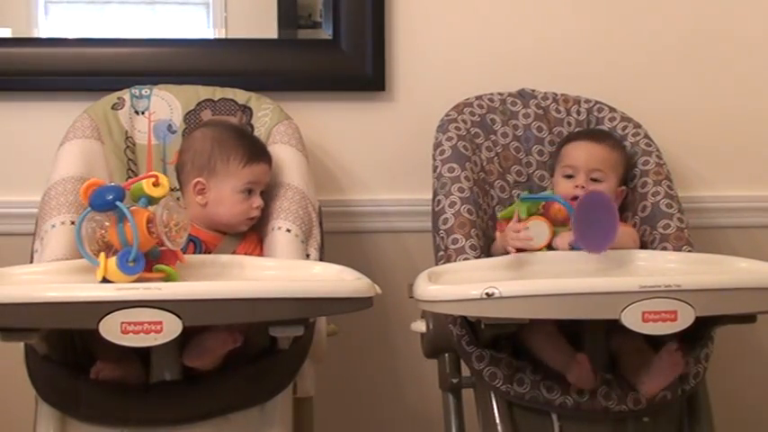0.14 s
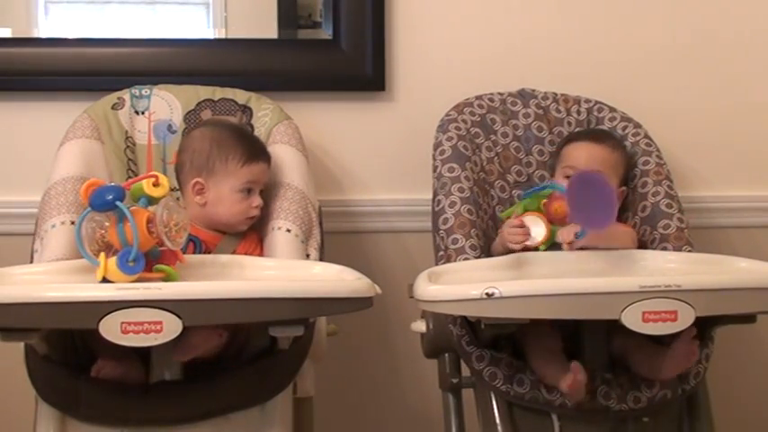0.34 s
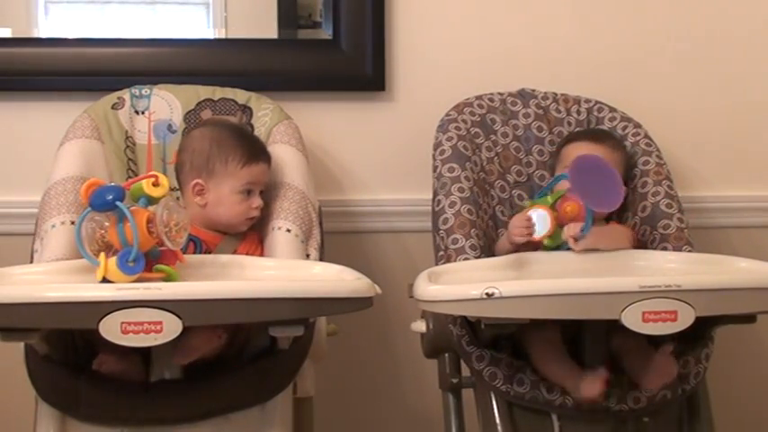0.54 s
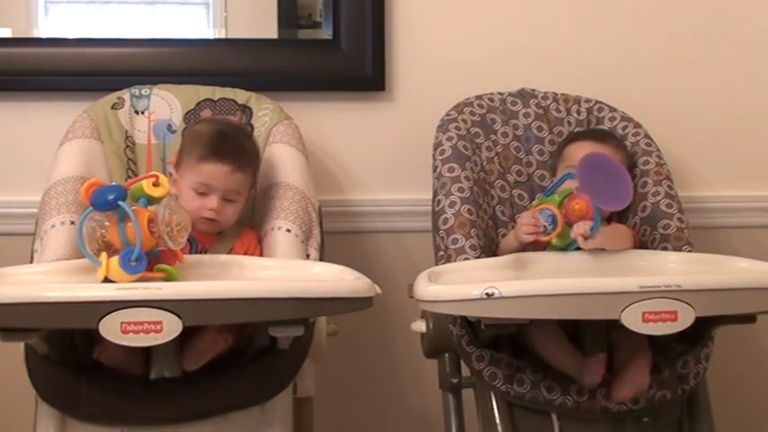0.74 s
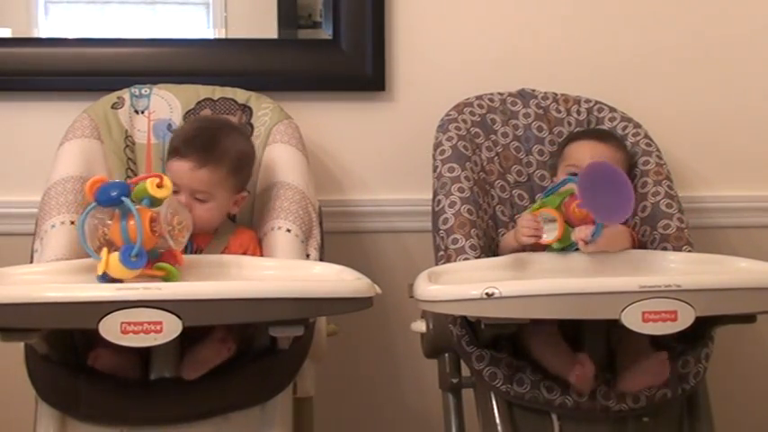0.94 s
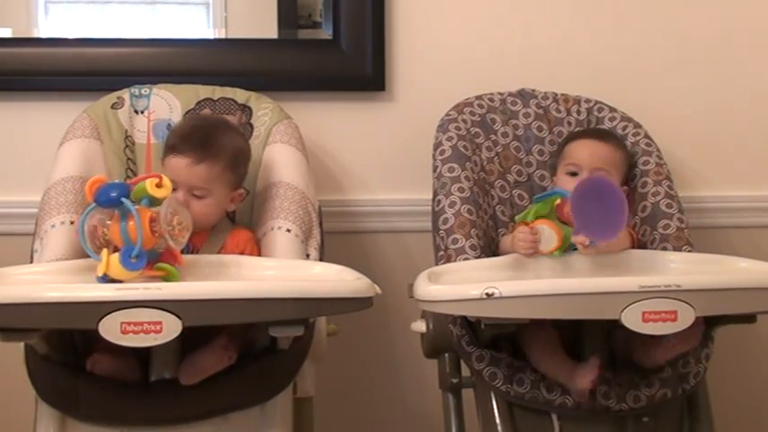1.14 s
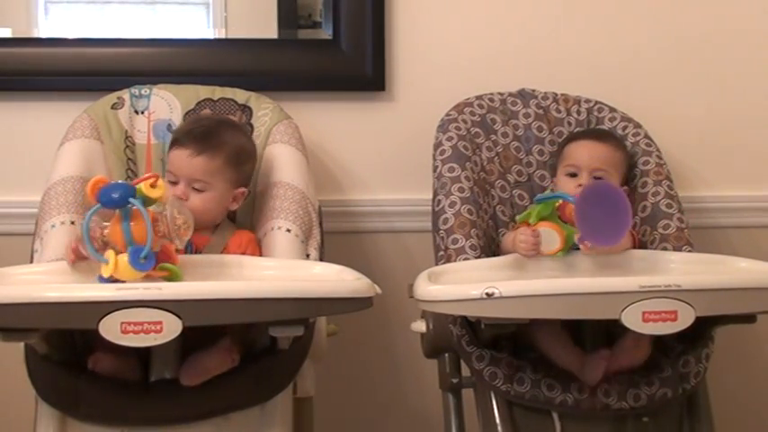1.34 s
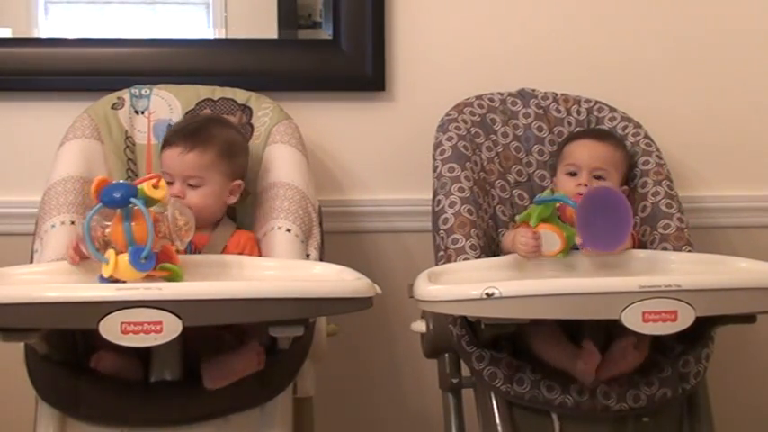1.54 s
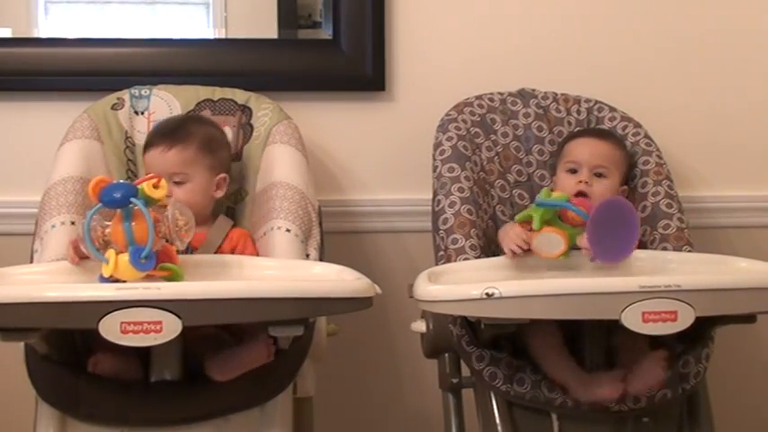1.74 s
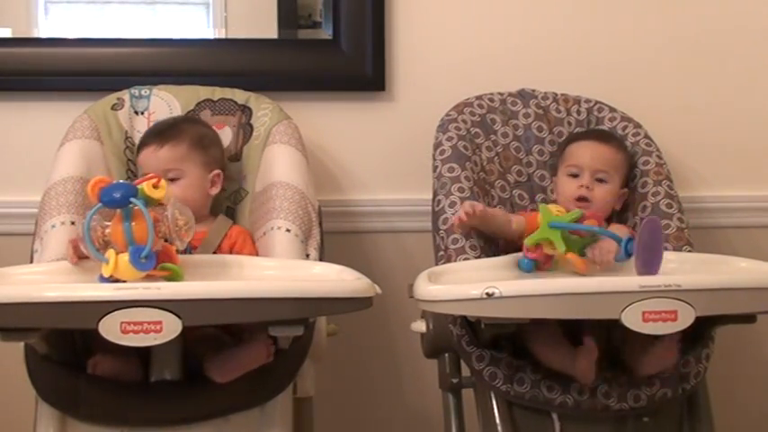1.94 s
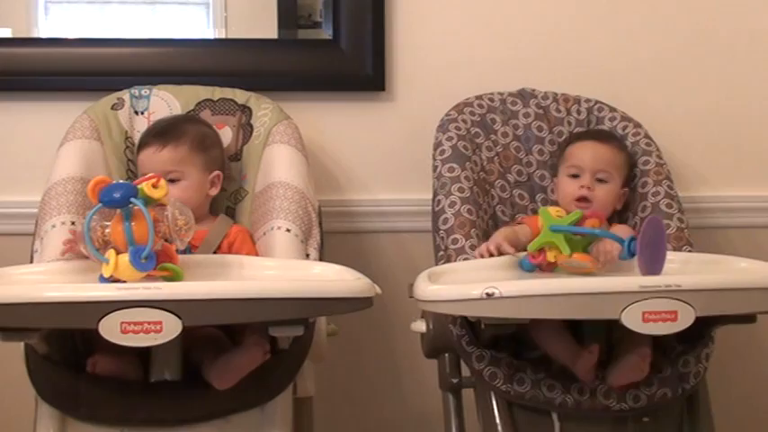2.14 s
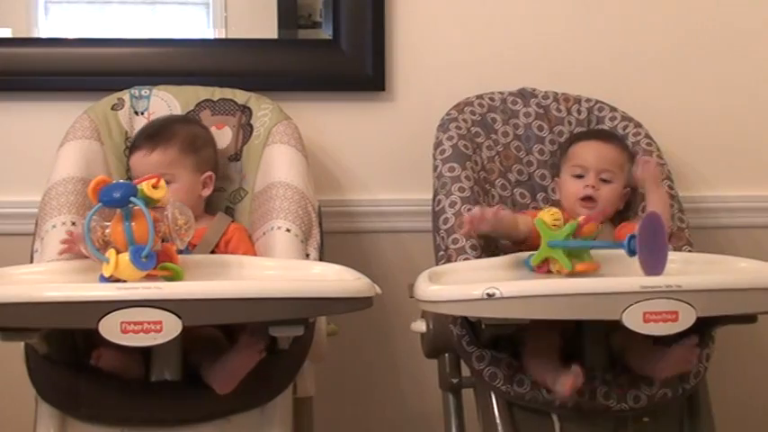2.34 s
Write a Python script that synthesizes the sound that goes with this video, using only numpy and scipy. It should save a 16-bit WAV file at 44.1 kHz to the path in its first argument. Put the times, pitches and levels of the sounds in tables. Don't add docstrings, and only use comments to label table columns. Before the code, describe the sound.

Baby shaking a plastic rattle: bell jingles, bead patter, sharp clacks and tray knocks with soft palm thumps, a quieter middle, then a loud late clatter, over low household hum, heard from a couple of metres.

```python
import sys
import numpy as np
from scipy import signal
from scipy.fft import rfft, irfft
from scipy.io import wavfile
from scipy.ndimage import uniform_filter1d, map_coordinates

SR = 44100
rng = np.random.default_rng(int(sys.argv[2]) if len(sys.argv) > 2 else 0)


def undo_db(level):
    steps = np.asarray(level, float) / 20
    return 10 ** steps


def int16_out(signal):
    q = np.round(np.clip(np.atleast_2d(signal).T, -1, 1) * 32767)
    wavfile.write(sys.argv[1], SR, q.astype(np.int16))


N = 105795
T = np.arange(N) / SR


def table(hz, rows):
    rows = np.array(rows)
    return np.interp(np.log(np.maximum(hz, 1)), np.log(rows[:, 0]), rows[:, 1])


def colour(x, rows):
    hz = np.arange(N // 2 + 1) * SR / N
    return irfft(rfft(x) * undo_db(table(hz, rows)), N)


def unit(x):
    return x / np.sqrt(np.mean(x ** 2))


def wander(s):
    size = int(s * SR)
    once = uniform_filter1d(rng.standard_normal(N), size=size)
    return unit(uniform_filter1d(once, size=size))


def ring(x, hz, t60, sway=0):
    decay = np.log(1000) / (max(t60, 1e-3) * SR)
    pole = np.exp(2j * np.pi * min(hz, SR / 2.3) / SR - decay)
    return (signal.lfilter([1], [1, -pole], x) * np.exp(1j * sway)).imag


def burst(hz, t60, gains):
    contact_s = 0.0012
    t = T[:6000, None]
    modes = gains * np.sin(2 * np.pi * hz * t) * np.exp(-np.log(1000) * t / t60)
    y = np.sum(modes, axis=1) * (1 - np.exp(-t[:, 0] / contact_s))
    return y / np.max(abs(y))


def add(out, s, x):
    i = int(s * SR)
    out[i:i + len(x)] += x[:len(out) - i]


# start_s, level_db, upper_db, lower_db (mode families relative to the main one)
PELLET_STRIKES = [(0.0595, -50, -10, -8), (0.0782, -41.5, -14, 5.5), (0.1236, -53, -8, -8),
                  (.134, -47, 11, -8), (.156, -36, -8, -10), (0.216, -35, -17, -32), (.236, -41, -10, -20),
                  (0.287, -37.5, -21, -11), (0.322, -48.5, 1, -10), (0.3358, -47, -7, -7),
                  (0.4016, -47, 2, 1), (0.416, -48, 7.5, -12), (0.435, -47, 2, 4), (0.4574, -49, -6, -11),
                  (0.477, -44, 4, -18), (0.5595, -46.5, 9.5, -14), (0.571, -43, 5, -17),
                  (0.5931, -39.5, -13, -24), (0.6138, -51, 11, 0), (0.6552, -34.5, -25, -13.5),
                  (0.6892, -39.5, -6, -10), (0.7135, -53, -11, -14), (0.7362, -49, -6, -14),
                  (0.749, -49, -6, 3.5), (0.7744, -54.5, 13.5, 1), (0.8, -51, 8, -13), (.845, -46, 2, -6),
                  (0.869, -52, 1, -16), (1.2288, -46.5, -15, -16), (1.251, -43.5, -4, -18),
                  (1.28, -37.5, -16, -8), (1.296, -39, 0, -8), (1.314, -36, -8, -19),
                  (1.3445, -43.5, 8.5, -6), (1.378, -43, -2, -2.5), (1.4077, -49, -2, -20),
                  (1.446, -46.5, -10, -18), (1.5369, -37, -20, -12), (1.5705, -42.5, -6, -25),
                  (1.5951, -37, -7, -28), (1.623, -46, -4, -20), (1.9704, -31, 8, -18),
                  (2.0492, -31.5, -12, -13), (2.1072, -40.5, 4, -7), (2.1639, -34.5, -3, -31),
                  (2.1984, -40, -3, -7), (2.23, -48, -6, -15), (2.3126, -47, -5, -10),
                  (2.3767, -44.5, -15, 6)]
BELL_PITCHES = [8409, 8372, 8447, 7445, 12710, 9405, 9350, 9720, 10310, 11300, 4001, 3962, 6020, 5350]
# level_db, t60_s
BELL_MODES = [(1, 0.12), (-6, 0.11), (-5.5, 0.1), (-7, 0.038), (-18, 0.097), (1, 0.079), (-5.5, 0.047),
              (-4, 0.046), (-8, 0.039), (-14, .04), (-1.5, 0.12), (-15.5, 0.37), (-8, 0.069), (-10, .12)]


def bell():
    bell_db, tick_db, roll_db, roll_s = -6.5, -9.5, -9.5, 0.025
    flutter_db, sway_rad, flutter_s = 2.5, 0.8, 0.012
    hits, tick, t = np.zeros((3, N)), np.zeros(N), T[:6000]
    for s, db, upper_db, lower_db in PELLET_STRIKES:
        grains = rng.standard_normal(6000) * (rng.random(6000) < 0.02)
        roll = undo_db(roll_db) * grains * np.exp(-t / roll_s)
        roll[[0, 47, 131]] = np.array([1, 0.3, 0.2]) * np.sign(rng.standard_normal(3))
        for family, rel_db in zip(hits, (0, upper_db, lower_db)):
            add(family, s, undo_db(db + rel_db + bell_db) * roll)
        scratch = rng.standard_normal(6000) * np.exp(-t / 0.01) * np.minimum(t / 0.0018, 1)
        add(tick, s, undo_db(db + tick_db) * scratch)
    out = colour(tick, [(3000, -13), (7000, 5), (10000, 10), (12000, 4), (16000, -20)])
    for k, (db, t60) in enumerate(BELL_MODES):
        flutter = undo_db(db + flutter_db * wander(flutter_s))
        out += flutter * ring(hits[k // 5], BELL_PITCHES[k], t60, sway_rad * wander(flutter_s))
    return out


# start_s, level_db (peak), pitch_hz, crack_db (relative)
PLASTIC_CLACKS = [(0.0784, -29, 2270, -3.5), (0.0849, -17.5, 3495, -11), (.0877, -16.5, 5300, -18),
                  (0.0941, -30, 5370, -18), (.1077, -32, 3900, -13), (.114, -35, 3660, -27),
                  (.124, -36, 6100, -3), (0.134, -34, 4850, -18), (0.1519, -19.5, 4920, -5.5),
                  (0.1571, -28, 4220, -6), (0.1606, -23, 6500, -8), (0.17, -32, 4040, -19),
                  (0.184, -28, 5600, -10), (0.2011, -30, 4480, -1), (0.2183, -34, 3140, 4.5),
                  (0.2708, -29, 4600, -16), (0.469, -30.5, 3030, -1.5), (0.4756, -21, 7440, -7.5),
                  (0.5153, -21.5, 1900, -5), (0.5455, -29.5, 6260, -0.5), (0.7741, -36.5, 1930, 3.5),
                  (0.897, -41, 6000, 0), (0.903, -38, 2910, -2.5), (0.9695, -19, 2360, -32),
                  (0.9738, -24, 2485, -13.5), (1.005, -29.5, 2960, -33), (1.065, -43, 3120, -3.5),
                  (1.1007, -28, 2524, -11), (1.213, -36, 4200, -7), (1.8641, -31, 3140, -7),
                  (1.8714, -26, 3860, -8), (1.917, -21, 3580, -7.5), (1.921, -21.5, 5600, 4),
                  (1.935, -15, 4420, -9), (1.959, -11, 5090, -8), (1.9666, -10.5, 5400, -10.5),
                  (1.9771, -18, 4450, -5), (1.981, -18.5, 2154, -0.5), (1.998, -21.5, 4910, -10),
                  (2.0605, -21, 6070, -4.5), (2.281, -27, 2480, -9), (2.2876, -25.5, 1530, -10),
                  (2.2955, -17, 2980, -13.5), (2.3083, -25.5, 3470, 0.5), (2.3145, -18.5, 2920, -9)]


def clacks():
    t60_s, spread, crack_s, clack_db = 0.026, 0.294, 0.0033, -10
    out, crack, t = np.zeros(N), np.zeros(N), T[:2000]
    fan = np.arange(-6, 7) / 3
    for s, db, hz, crack_db in PLASTIC_CLACKS:
        luck = rng.standard_normal((2, 13))
        ratios = np.exp(spread * (fan + 0.1 * luck[0] * (fan != 0)))
        gains = undo_db(1.2 * luck[1] - 8 * np.sqrt(abs(fan)))
        add(out, s, undo_db(db + clack_db) * burst(hz * ratios, t60_s / ratios, gains))
        swell = t / crack_s * np.exp(1 - 2 * t / crack_s)
        add(crack, s, undo_db(db + crack_db + 0.5) * rng.standard_normal(2000) * swell)
    return out + colour(crack, [(800, -4.0), (3000, 6), (7000, 5.0), (11000, -3), (16000, -20)])


# start_s, level_db (peak), pitch_hz
TRAY_KNOCKS = [(0.097, -40, 780), (0.158, -34.5, 858), (0.239, -49, 302), (0.467, -37.5, 1540),
               (0.5085, -22, 996), (0.514, -36, 904), (0.522, -25, 1170), (0.534, -62, 1020),
               (0.545, -37, 1114), (0.77, -30, 1175), (0.809, -38, 1110), (0.974, -28.5, 1690),
               (1.911, -30.5, 560), (1.92, -15, 569), (1.931, -22.5, 425), (1.967, -18, 634),
               (1.973, -18, 901), (1.983, -24.5, 363), (1.999, -24, 663), (2.019, -37, 750),
               (2.039, -24, 657), (2.065, -34, 487), (2.131, -53, 622), (2.173, -36.5, 658),
               (2.284, -29, 660), (2.313, -26, 880), (2.379, -29.5, 870)]


def tray():
    t60_s, spread, knock_db = 0.03, 0.3375, -1
    thud_hz, thud_t60_s, thud_db = 350, 0.083, -19
    out, fan = np.zeros(N), np.arange(-4, 5) / 2
    for s, db, hz in TRAY_KNOCKS:
        luck = rng.standard_normal((3, 9))
        ratios = np.exp(spread * (fan + 0.204 * luck[0] * (fan != 0)))
        between = ratios * np.exp(spread / 4 + 0.02 * luck[2])
        ratios = np.append(ratios, between)
        gains = np.tile(undo_db(1.5 * luck[1] - 4.5 * abs(fan)), 2)
        add(out, s, undo_db(db + knock_db) * burst(hz * ratios, t60_s, gains))
        thud_modes = thud_hz * np.exp(0.15 * luck[2, :3])
        add(out, s, undo_db(db + thud_db) * burst(thud_modes, thud_t60_s, np.ones(3)))
    return out


# start_s, level_db (peak)
PALM_THUMPS = [
    (.512, -40),
    (0.551, -34),
    (0.602, -41),
    (1.976, -35.5),
]


def palm():
    thump_hz, t60_s = 232.5, 0.13
    modes = thump_hz * np.array([0.46, 0.92, 1, 1.15])
    gains = undo_db(np.array([-2, -1.5, 0, 2.5]))
    out = np.zeros(N)
    for s, db in PALM_THUMPS:
        add(out, s, undo_db(db) * burst(modes, t60_s, gains))
    return out


# start_s, level_db (peak), pitch_hz, t60_s
BELL_PINGS = [(0.4573, -45, 4600, 0.025), (0.5436, -33, 4650, 0.02), (0.592, -34.5, 4670, 0.02),
              (1.278, -46.5, 4001, 0.29), (1.105, -49, 2660, 0.14), (2.12, -39, 625, 0.16),
              (1.295, -50, 5900, .08), (1.35, -45, 5320, 0.088), (1.352, -50, 2594, 0.25),
              (1.389, -52.5, 2533, 0.11), (2.0097, -26, 4610, .03), (2.0582, -29.5, 3940, 0.07),
              (2.079, -38, 3960, 0.054), (2.147, -43, 3975, 0.1), (2.1848, -41, 4000, 0.11),
              (2.18, -40, 5470, 0.043), (2.207, -49, 5170, 0.11), (2.326, -37, 2270, 0.071)]


def pings():
    out = np.zeros(N)
    for s, db, hz, t60 in BELL_PINGS:
        add(out, s, undo_db(db) * burst(hz * np.array([1, 1.011]), t60, undo_db(np.array([0, -7]))))
    return out


# start_s, level_db
SHAKE_EFFORT = [(0, -43), (0.073, -55.5), (0.083, -34), (.2, -38.5), (.4, -56.5), (.5, -48.5), (0.651, -50),
                (.9, -54), (1.2, -57.5), (1.35, -50), (1.5, -62.5), (1.78, -66), (1.901, -53), (1.923, -28),
                (1.98, -30), (2.08, -35.5), (2.27, -48.5), (2.309, -39.5), (2.4, -55)]
# pitch_hz, level_db (per Hz)
BEAD_SPECTRUM = [(700, -7), (1500, -8), (3000, -9), (5000, -1), (8000, -3), (11000, -6), (16000, -11.5)]


def beads():
    beads_per_s, scatter_db, t60_s = 1400, 6.5, 0.003
    out = np.zeros(N)
    for hz in 700 * 2 ** np.arange(0, 4.6, 0.25):
        struck = rng.random(N) < beads_per_s / SR / 4
        taps = struck * undo_db(scatter_db * np.minimum(rng.exponential(size=N), 3))
        out += undo_db(table(hz, BEAD_SPECTRUM)) * np.sqrt(hz) * unit(ring(taps, hz, t60_s * 4000 / hz))
    shake = np.array(SHAKE_EFFORT)
    return unit(out) * undo_db(np.interp(T, shake[:, 0], shake[:, 1]) - 4.0)


# pitch_hz, t60_s
ROOM_DECAY = [(150, 0.47), (1000, 0.41), (4000, 0.49), (12000, 0.21)]


def room(x):
    f, t, z = signal.stft(rng.standard_normal((2, 30000)), SR, nperseg=256)
    decay = undo_db(-60 * t / table(f, ROOM_DECAY)[:, None])
    tail = signal.istft(z * decay, SR, nperseg=256)[1]
    tail = tail * np.minimum(T[:tail.shape[1]] / 0.0031, 1) ** 2
    return signal.fftconvolve(x[None], tail / np.sqrt(np.sum(tail[0] ** 2)), axes=1)[:, :N]


# pitch_hz, level_db (per Hz)
HOUSE_SPECTRUM = [(40, -7.5), (75, -12.5), (125, 0), (240, -8.5), (500, -16), (2000, -22.5), (5000, -32.5),
                  (16000, -46.5)]


def house():
    both = np.array([colour(rng.standard_normal(N), HOUSE_SPECTRUM) for _ in range(2)])
    drift = unit(uniform_filter1d(rng.standard_normal(N), size=2000))
    return unit(both) * undo_db(-49.5 + 0.7 * drift)


# pitch_hz, level_db
SIDE_SPECTRUM = [(30, -17), (125, -43), (250, -13), (1000, -8), (8000, -9), (11500, -1.5), (13000, -51)]


def scene():
    room_db, bell_room_db, ping_room_db, pan_db = -0.5, -2, -8, -0.55
    low_cut_hz, stir_s, stir_samples = 300, 0.051, 2.75
    jingle, ping, plastic = bell(), pings(), clacks() + tray() + beads()
    low_cut = signal.butter(6, low_cut_hz, 'high', fs=SR, output='sos')
    plastic = signal.sosfilt(low_cut, plastic) + palm()
    echo = room(plastic * undo_db(room_db) + jingle * undo_db(bell_room_db) + ping * undo_db(ping_room_db))
    late = np.arange(N) + stir_samples * wander(stir_s)
    stirred = np.array([map_coordinates(x, [late], mode='mirror') for x in echo])
    mid, side = stirred + house()
    pan = undo_db(np.array([[pan_db], [-pan_db]]) / 2)
    return (jingle + ping + plastic + mid) * pan + colour(side, SIDE_SPECTRUM) * np.array([[1], [-1]])


def band_limit(x):
    return signal.sosfilt(signal.butter(12, 16790, fs=SR, output="sos"), x)


def record(dry):
    top_hz = 16700
    cut = np.array([colour(x, [(top_hz, 0), (top_hz + 60, -90)]) for x in dry])
    return band_limit(cut)


dry = scene()
out = record(dry)
int16_out(out)
```